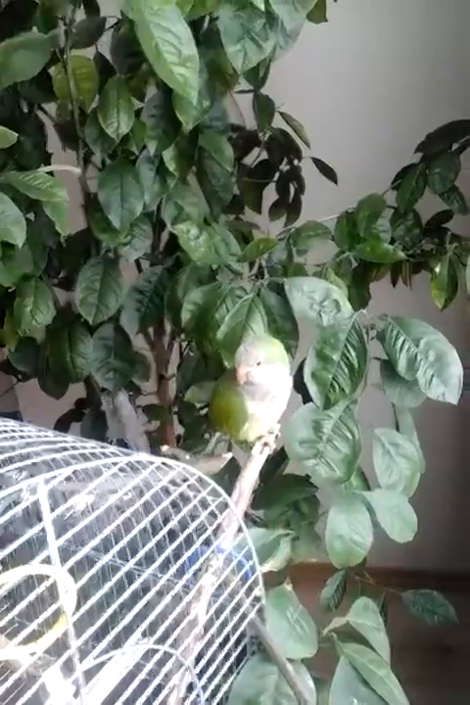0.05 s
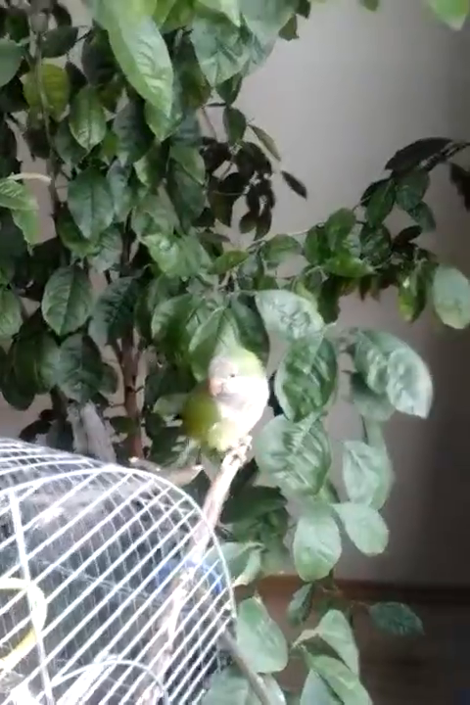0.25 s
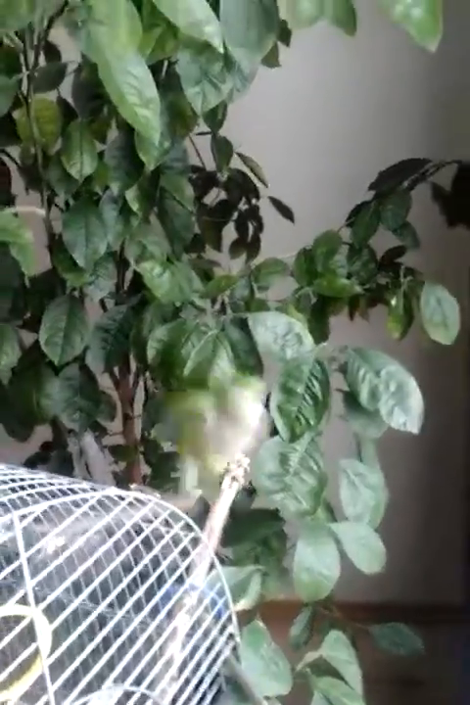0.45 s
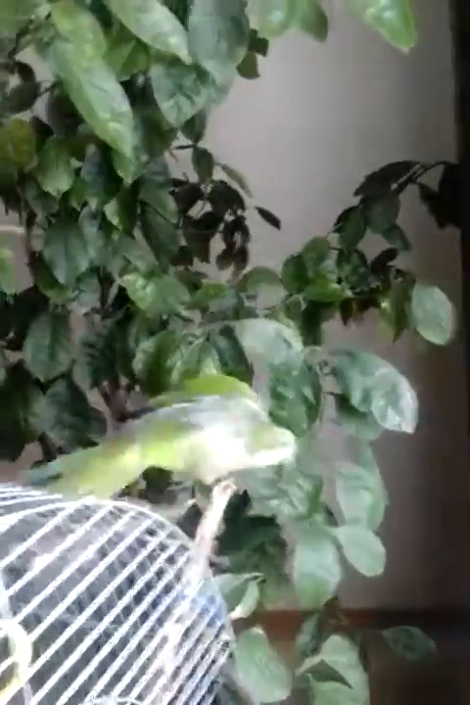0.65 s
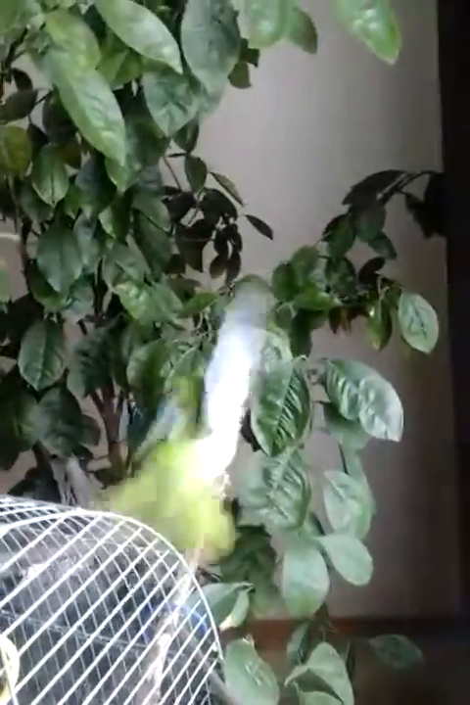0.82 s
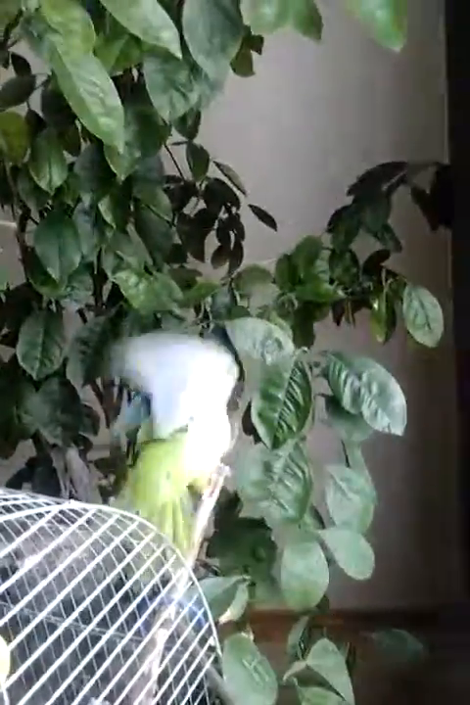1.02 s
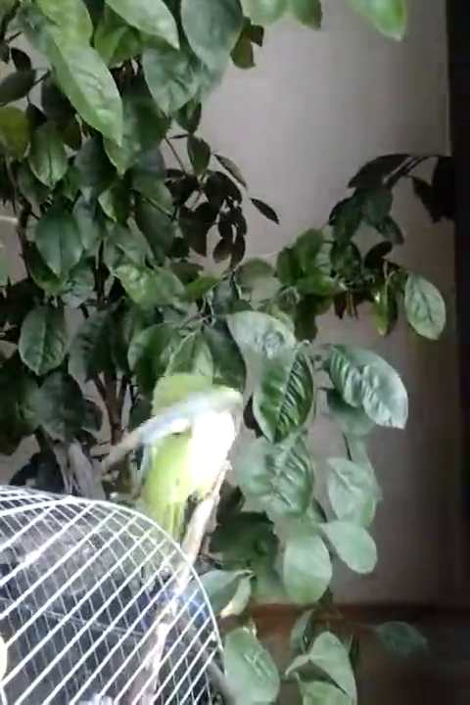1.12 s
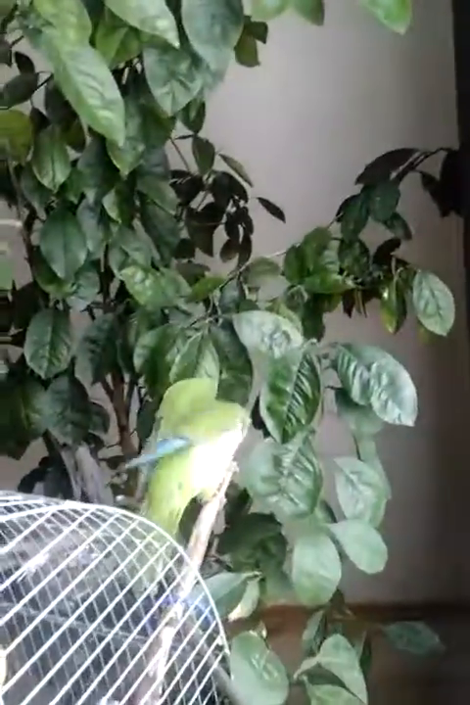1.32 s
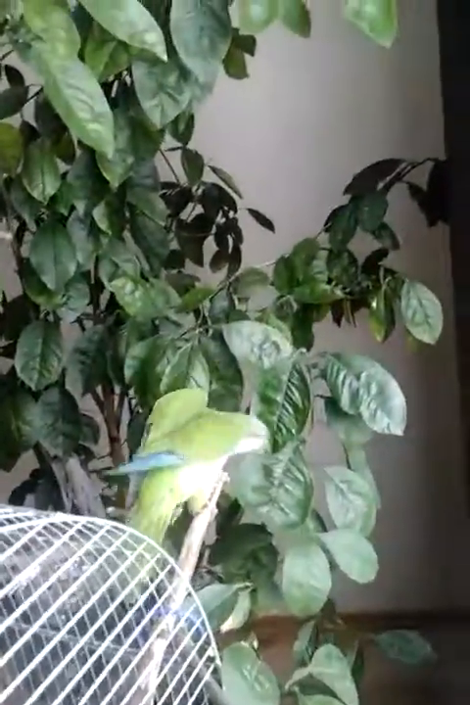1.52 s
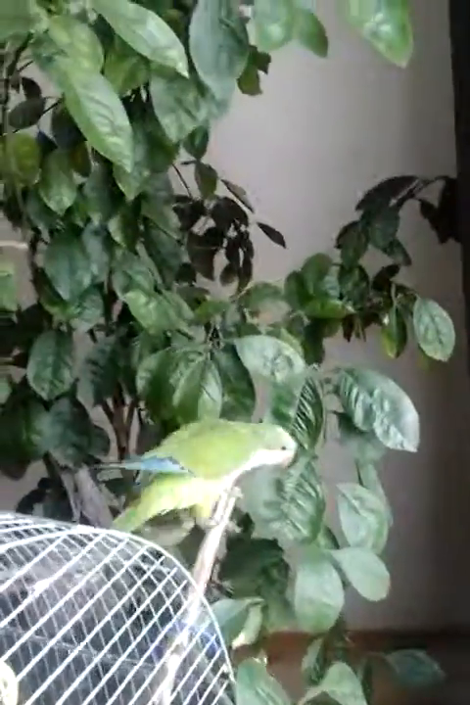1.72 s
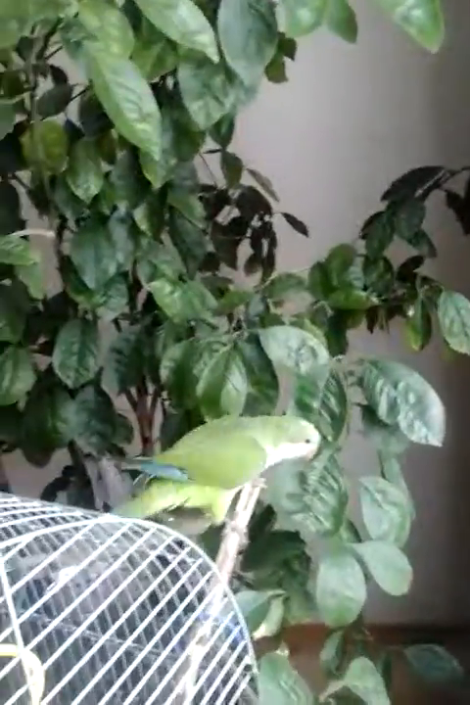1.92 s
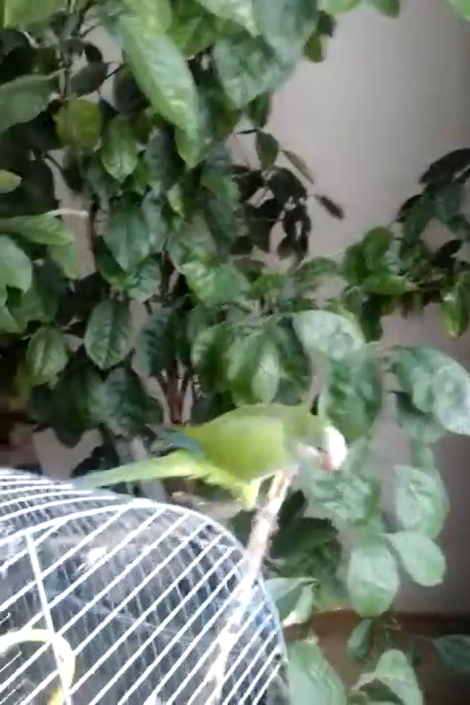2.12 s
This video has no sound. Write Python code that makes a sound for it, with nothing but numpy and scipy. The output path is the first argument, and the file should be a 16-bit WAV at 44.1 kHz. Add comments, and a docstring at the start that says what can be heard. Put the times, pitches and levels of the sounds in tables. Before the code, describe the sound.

A small parrot clacks on a wooden perch atop its wire cage in an echoing room, loudest at 0.2 and 0.5 seconds, with claw and beak ticks. More knocks come around 0.8 seconds, then a brief wing rustle and faint taps until 1.5. Feathers rustle from 1.6 to 1.9 seconds as stirred air softly buffets the microphone on the right. A few more clacks land around 2 seconds.

```python
"""A bare, lively room. A small parrot knocks and clacks on a wooden perch on top of its wire cage,
flaps, and settles its feathers. Each knock rings perch and wires, and the room answers; claws and
beak tick, sliding feathers rustle. The two microphone ports ring near 4 and 6 kHz, and near the end
stirred air buffets the right one."""
import sys
import numpy as np
from scipy import signal
from scipy.io import wavfile
from scipy.ndimage import uniform_filter1d

SR = 44100
rng = np.random.default_rng(int(sys.argv[2]) if len(sys.argv) > 2 else 0)


def output_pcm(signal):
    """Save a mono or channel-first signal as 16-bit PCM at the path in sys.argv[1].

    Samples are clipped to [-1, 1] before scaling.
    """
    pcm = np.clip(np.atleast_2d(signal).T, -1, 1) * 32767
    wavfile.write(sys.argv[1], SR, np.round(pcm).astype(np.int16))


N = 94815


def amp(db):
    """Decibels to gain."""
    return 10 ** (np.asarray(db) / 20)


def at_hz(points, hz):
    """Interpolate a table on a log-frequency axis."""
    f, value = np.transpose(points)
    return np.interp(np.log(hz + 1), np.log(f + 1), value)


def unit_rms(x):
    """Scale to rms 1."""
    return x / np.sqrt(np.mean(x ** 2) + 1e-20)


def add(mix, start_s, sound):
    """Mix a sound in at start_s."""
    part = mix[:, max(round(start_s * SR), 0):][:, :sound.shape[1]]
    part += sound[:, :part.shape[1]]


def sides(pan_db):
    """Left and right gains, the louder at 1; positive is left."""
    return amp(np.minimum([[pan_db], [-pan_db]], 0))


def colour(x, points, size=4096):
    """Minimum-phase filter; points: f/Hz, gain/dB."""
    log_gain = np.log(amp(at_hz(points, abs(np.fft.fftfreq(size, 1 / SR)))))
    taps = np.fft.ifft(np.exp(np.conj(signal.hilbert(log_gain)))).real[:size // 2]
    return signal.fftconvolve(x, taps[None], axes=1)[:, :x.shape[1]]


def grains(n, depth=0.12, clump_samples=16):
    """Stereo noise in tiny clumps."""
    clumps = unit_rms(uniform_filter1d(rng.standard_normal((2, n)), clump_samples))
    return unit_rms(rng.standard_normal((2, n)) * np.exp(depth * clumps))


def knocks(snap_decay_s=0.016, clack_db=3, clack_ratio=1.11):
    """Knocks on the perch: a bright snap, the room's answer, ringing wood and cage wires."""
    # t/s, level/dB, below 2.6 kHz/dB, above 10 kHz/dB, perch/dB, cage/dB, tail/dB, clack f/Hz
    hits = [(0.1367, -56, 15, 5.5, -14, 14, 9, 7200), (0.233, -27, 1.5, 1, 5, -3, 6, 3980),
            (0.5474, -31, 3, 2.5, -11, -5, -1, 4600), (0.7603, -41.5, -7.5, 1, 1, -9, -1.5, 4100),
            (.8180, -38, 3, 0.5, 4.5, -7.5, -3, 4960), (0.956, -52.5, 1.5, -6, 8, 4, 7.5, 4950),
            (.9880, -46.5, 5.5, -5.5, 6, -0.5, -4.5, 5200), (1.1610, -54, 4.5, -7, 8.5, 1, 3, 5040),
            (1.2200, -58.5, 6.5, -23, -1, 1, 2.5, 5130), (1.3231, -55.5, 7, -4.5, 8.5, -2, 5, 4930),
            (1.3620, -58.5, 5, -31, 7.5, -2, -2, 5100), (1.4835, -54.5, 5, -15, 8, -6, -4, 4970),
            (1.9767, -43, 0.5, -5, 0, -5, 0.5, 4000), (2.0680, -45.5, 2, -2.5, 3.5, -1.5, -1.5, 5400)]
    # f/Hz, gain/dB
    knock_eq = [(40, -58), (150, -20), (280, -14.5), (450, -5.5), (900, -2.5), (2300, -0.5), (4500, 3),
                (8000, 2.5), (14000, 6.5)]
    # f/Hz, level/dB, t60/s
    perch_modes = [(506, -5.5, 0.16), (646.7, 0, 0.11), (687, -11.5, 0.42), (774.7, -3.5, 0.21),
                   (865, -10.5, 0.45), (1148, -4, 0.058)]
    # f/Hz, level/dB, t60/s
    cage_modes = [(781, -9, .7), (1674, -4, .35), (1836, -9, .5), (2923, -3, .4), (3945, -9, .5),
                  (4045, -8, .5), (5302, -9, .5), (5665, -11, .5), (5802, -11, .5), (6250, -11, .5),
                  (7005, -7, .4), (7424, -1, .25), (9927, -4, .3), (12760, -3, .45)]
    out, t = np.zeros((2, N)), np.arange(SR) / SR
    perch = amp(-7.5) * ring(perch_modes, spread_cycles=0.6)
    cage = amp(-9.5) * ring(cage_modes, spread_cycles=0.82)
    for start_s, db, body_db, top_db, perch_db, cage_db, tail_db, hz in hits:
        burst = amp(-10) * grains(SR) * np.exp(-t / snap_decay_s)
        snap = colour(burst, [(6000, 0), (9000, 11)])
        clack = colour(snap + room(tail_db), knock_eq)
        clack = colour(clack, [(hz / clack_ratio, 0), (hz, clack_db), (hz * clack_ratio, 0)])
        clack = colour(clack, [(2600, body_db), (3800, 0), (6500, 0), (10000, top_db)])
        add(out, start_s, amp(db) * clack)
        add(out, start_s, amp(db) * (amp(perch_db) * perch + amp(cage_db) * cage))
    return out


def ring(modes, spread_cycles, rise_s=0.0016):
    """Damped modes of a struck body; left and right phases differ by up to spread_cycles."""
    t = np.arange(SR * 3 // 4) / SR
    tones = np.zeros((2, len(t)))
    for hz, db, t60_s in modes:
        cycles = hz * t + rng.random() + spread_cycles * rng.random((2, 1))
        tones += amp(db - 60 * t / t60_s) * np.sin(2 * np.pi * cycles)
    return tones * (1 - np.exp(-t / rise_s))


def ticks(overtone_ratio=2.17, overtone_db=-13.5):
    """Hard contacts of claws and beak: a dry click and a short ping."""
    # t/s, level/dB, left-right/dB, ping f/Hz, ping/dB, decay/s
    contacts = [(0.236, -26.5, -12, 5530, 5.5, 0.0014), (.4710, -23.5, 16, 1360, -9, 0.002),
                (.5555, -30.5, -10.5, 5830, -2.5, 0.006), (0.581, -36, -13.5, 3830, -5, .005),
                (0.7905, -44.5, 1, 3970, 4.5, 0.0066), (.8535, -42, -5, 5400, -3, .002),
                (1.6265, -44.5, -10, 2760, 21, 0.0027), (2.07, -28, -23, 6360, -5, 0.00035),
                (2.0986, -37, -1, 5300, 3, 0.0015)]
    # f/Hz, gain/dB
    click_eq = [(60, -25), (300, -6), (900, -1), (2000, 3.5), (6000, -14), (9500, 5), (14000, -1)]
    out, t = np.zeros((2, N)), np.arange(SR // 10) / SR
    for start_s, db, pan_db, hz, ping_db, decay_s in contacts:
        fade, phase = np.exp(-t / decay_s), 2 * np.pi * hz * t
        click = colour(rng.standard_normal((2, len(t))) * fade, click_eq)
        ping = (np.sin(phase) + amp(overtone_db) * np.sin(overtone_ratio * phase)) * fade
        add(out, start_s, amp(db) * sides(pan_db) * (click + amp(ping_db) * ping))
    return out


def feathers(wet_db=-5.5):
    """Feathers slide over each other in fine grains, heard partly through the room."""
    # t/s, level/dB
    envelope = [(0, -76.5), (.8, -69), (.9, -45.5), (1.03, -57.5), (1.12, -61.5), (1.45, -66.5),
                (1.54, -54.5), (1.622, -42), (1.70, -45.5), (1.79, -47), (1.891, -47.5), (1.96, -60),
                (2.03, -53.5), (2.15, -48)]
    # f/Hz, gain/dB
    rustle_eq = [(50, -47), (300, 0), (900, 3), (1800, 2.5), (2350, 6), (2750, 10.5), (3300, -1.5),
                 (4000, -1.5), (5000, 2), (6200, -1.5), (8500, 1.5), (10500, -2), (14000, -14)]
    gain = amp(np.interp(np.arange(N) / SR, *np.transpose(envelope)))
    rustle = gain * colour(grains(N, depth=0.24, clump_samples=90), rustle_eq)
    response = unit_rms(room(tail_db=0)) / np.sqrt(SR)
    return rustle + amp(wet_db) * signal.fftconvolve(rustle, response, axes=1)[:, :N]


def air_puffs(rise_s=0.0065):
    """Stirred air hits the microphone in low bumps, mostly on the right."""
    # t/s, level/dB, left-right/dB, decay/s, f/Hz
    puffs = [(0.37, -33, -5, 0.0032, 345), (1.699, -23.5, -35, 0.0087, 166.6), (1.725, -45, -17, 0.12, 132),
             (1.795, -35, -26, 0.026, 154), (1.878, -37, -18, 0.043, 139), (2.049, -38.5, -20, 0.069, 190),
             (2.090, -31.5, -20, 0.013, 163), (2.132, -41, -24, .04, 137)]
    # multiple of f, gain/dB
    puff_eq = [(.1, -12), (.35, -14.5), (.65, -0.5), (1, -4), (1.6, -8), (3, -28), (8, -38), (28, -58)]
    out, t = np.zeros((2, N)), np.arange(SR // 2) / SR
    for start_s, db, pan_db, decay_s, hz in puffs:
        spectrum = [(multiple * hz, gain_db) for multiple, gain_db in puff_eq]
        rumble = unit_rms(colour(rng.standard_normal((2, len(t))), spectrum))
        envelope = np.minimum(t / rise_s, 1) * np.exp(-np.maximum(t - rise_s, 0) / decay_s)
        add(out, start_s, amp(db) * sides(pan_db) * envelope * rumble)
    return out


def room(tail_db, rise_s=0.036, patch_depth=0.23, frame=256):
    """Impulse response: wall echoes over a diffuse tail that dies faster in the treble."""
    # f/Hz, t60/s
    reverb_times = [(200, 1), (800, 0.73), (2000, 0.77), (4000, 0.63), (6000, 0.52), (9000, 0.53),
                    (14000, 0.29)]
    # delay/s, level/dB, decay/s
    wall_echoes = [(.003, 1, .006), (.0125, -4, .003), (.031, 1, .004), (.0362, 3, .007), (.048, -2, .006)]
    t = np.arange(SR) / SR
    hz, age_s, bins = signal.stft(grains(SR), SR, nperseg=frame)
    patches = unit_rms(uniform_filter1d(rng.standard_normal(bins.shape), size=8, axis=2))
    loss = np.log(1000) * age_s / at_hz(reverb_times, hz)[:, None]
    tail = signal.istft(bins * np.exp(patch_depth * patches - loss), SR, nperseg=frame)[1][:, :SR]
    power = amp(tail_db - 0.5) ** 2 * (1 - np.exp(-t / rise_s))
    for delay_s, db, decay_s in wall_echoes:
        power += amp(db) ** 2 * (t > delay_s) * np.exp(-abs(t - delay_s) / decay_s)
    return tail * np.sqrt(power)


def room_air(level_db=-57):
    """Faint steady noise of the room."""
    # f/Hz, gain/dB
    air_eq = [(20, -10), (60, -12.5), (180, -0.5), (350, -2.5), (800, -6), (1500, -13), (3000, -24.5),
              (6000, -39.5), (14000, -12)]
    return amp(level_db) * unit_rms(colour(rng.standard_normal((2, N)), air_eq))


def scene():
    """The bird over the room's air."""
    return room_air() + knocks() + ticks() + feathers() + air_puffs()


def record(dry, clip_level=0.85, cutoff_hz=14750):
    """Each microphone port adds its resonances; then clipping and a low-pass."""
    # f/Hz, left/dB, right/dB
    port_response = [(1060, 2, 1), (2630, -0.5, 1), (3084, 4.5, 3.5), (3714, 13, 14.5), (4780, 14, 14.5),
                     (5090, 16.5, 16.5), (5680, 4, 25), (6270, 16, 21.5), (7400, 2, 8.5), (9850, -2.5, 0),
                     (15000, -8, -6)]
    ports = np.array(port_response)
    heard = np.vstack([colour(dry[k:k + 1], ports[:, [0, k + 1]]) for k in range(2)])
    lowpass = signal.firwin(255, cutoff_hz, window=("kaiser", 8), fs=SR)
    return signal.oaconvolve(np.clip(heard, -clip_level, clip_level), lowpass[None], "same")


dry = scene()
out = record(dry)
output_pcm(out)
```